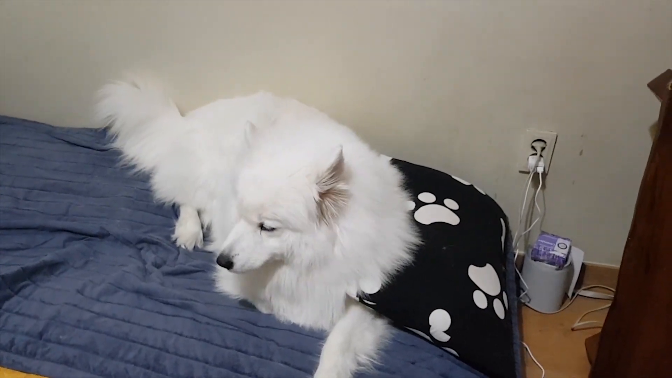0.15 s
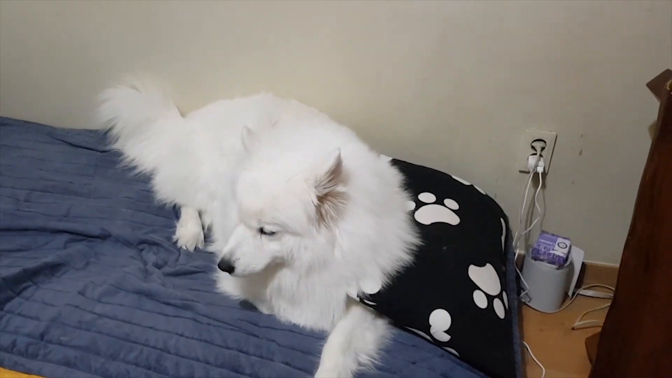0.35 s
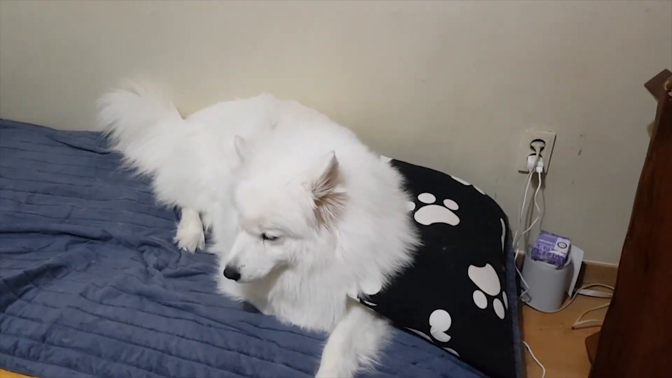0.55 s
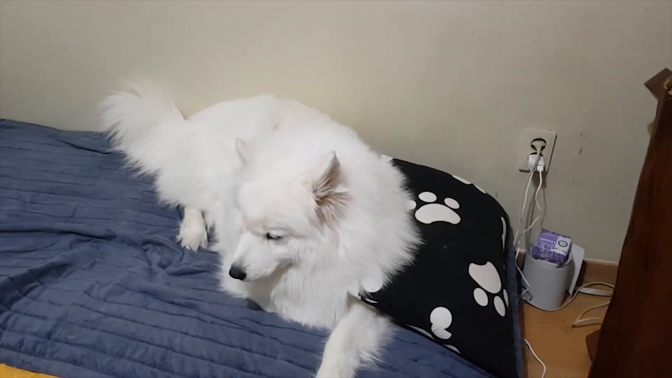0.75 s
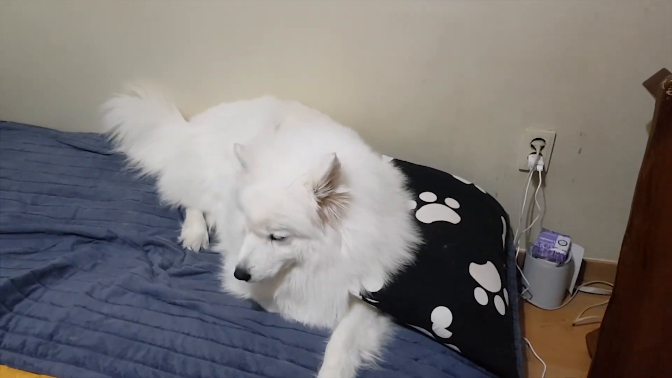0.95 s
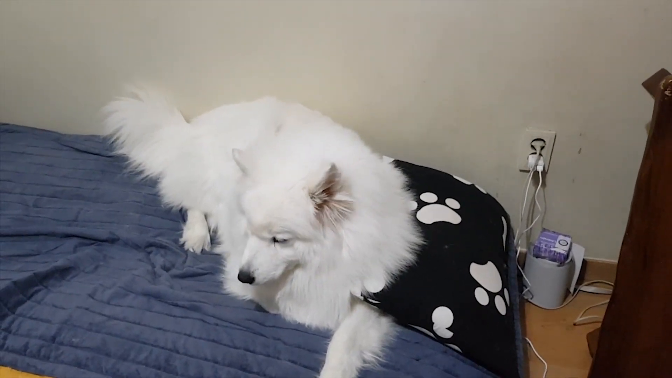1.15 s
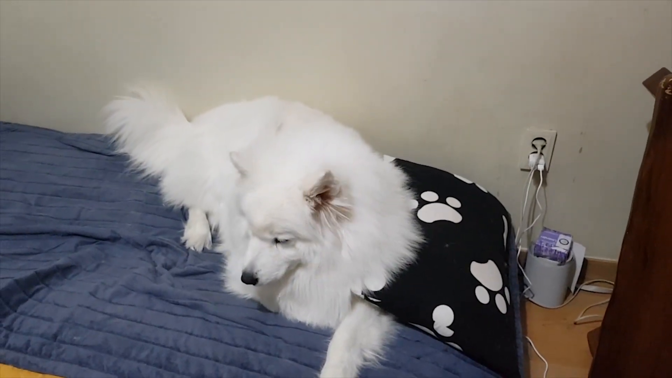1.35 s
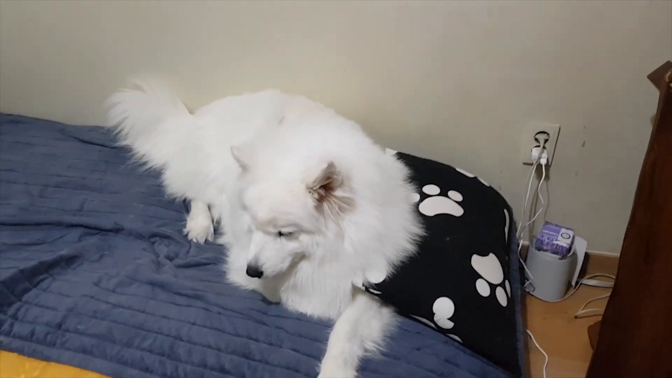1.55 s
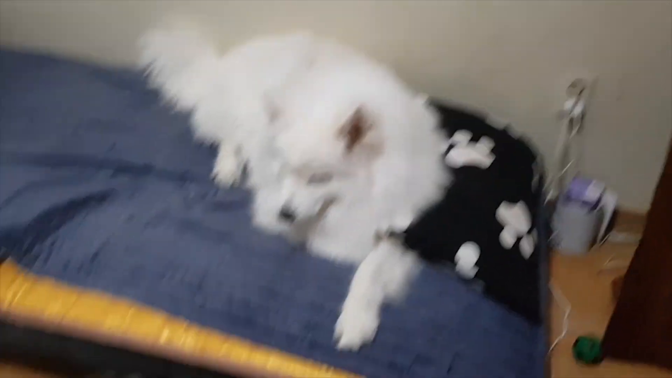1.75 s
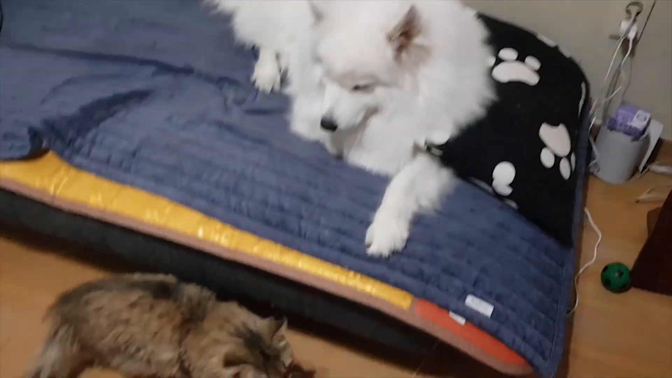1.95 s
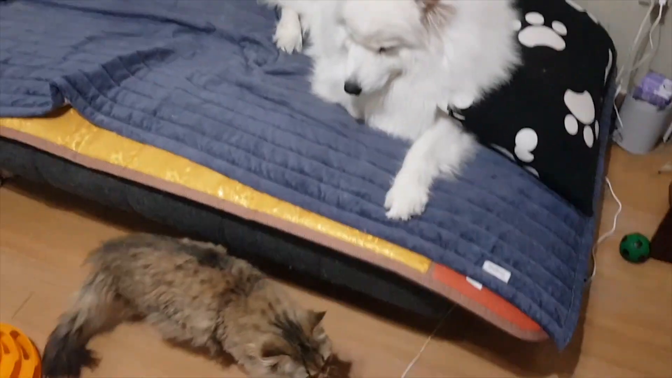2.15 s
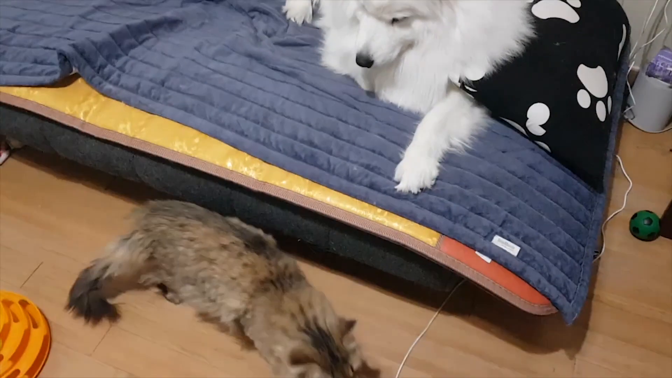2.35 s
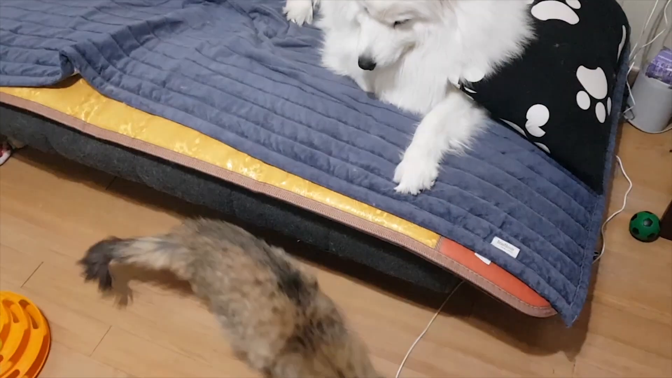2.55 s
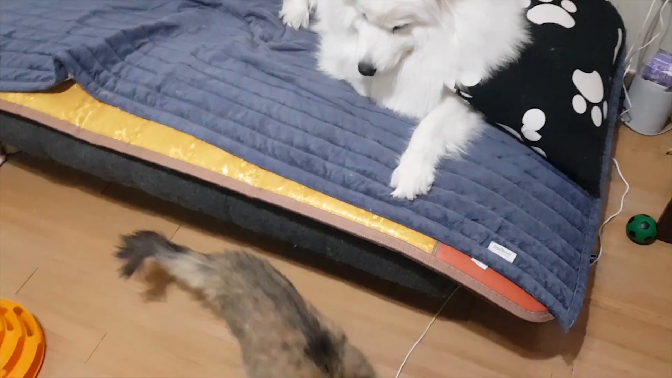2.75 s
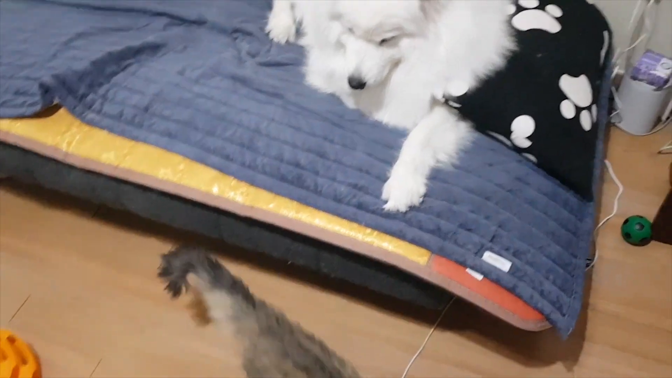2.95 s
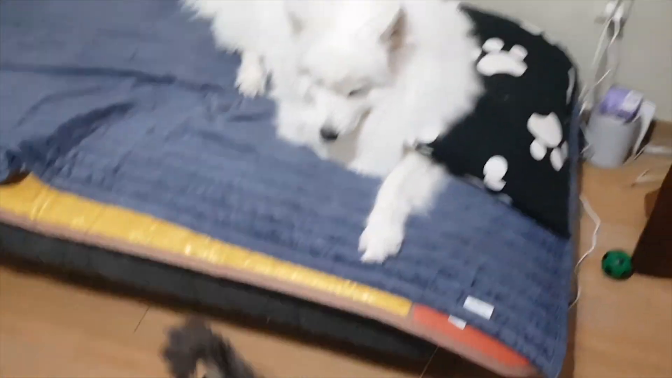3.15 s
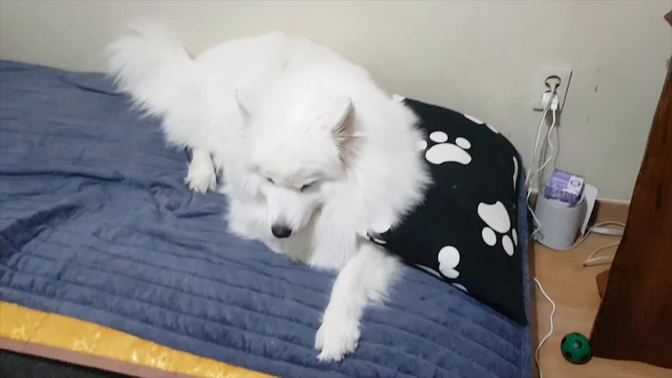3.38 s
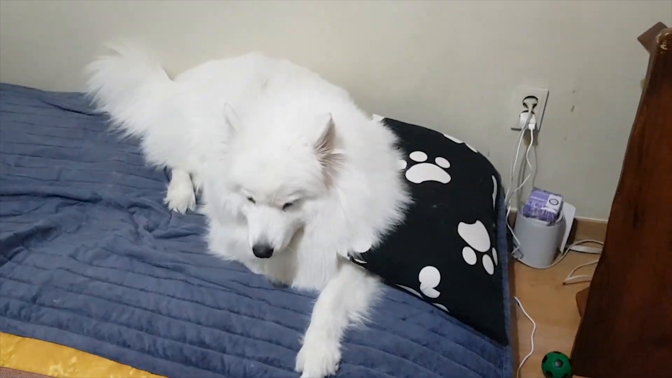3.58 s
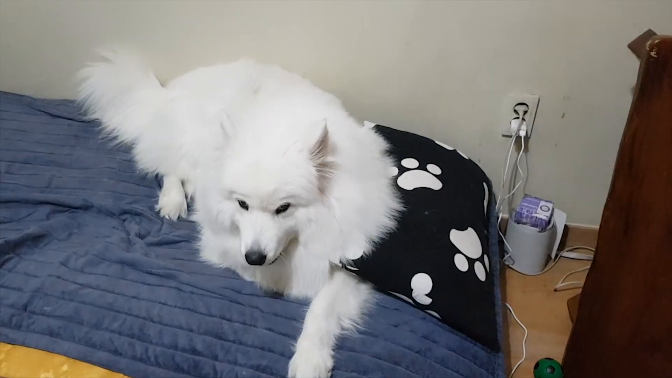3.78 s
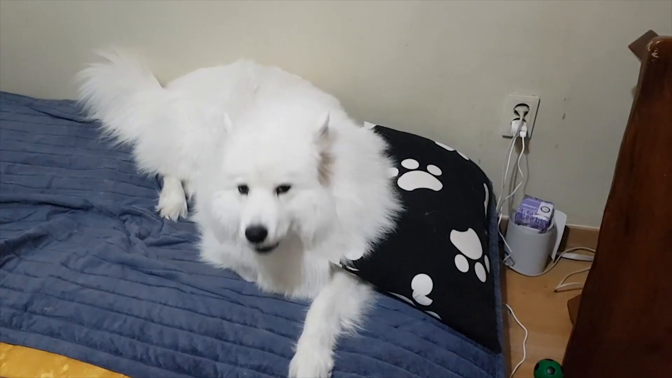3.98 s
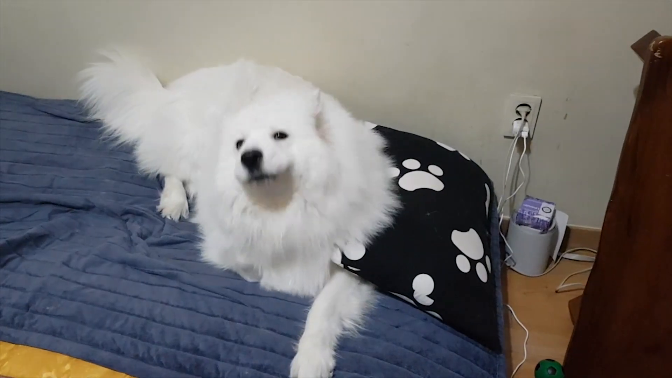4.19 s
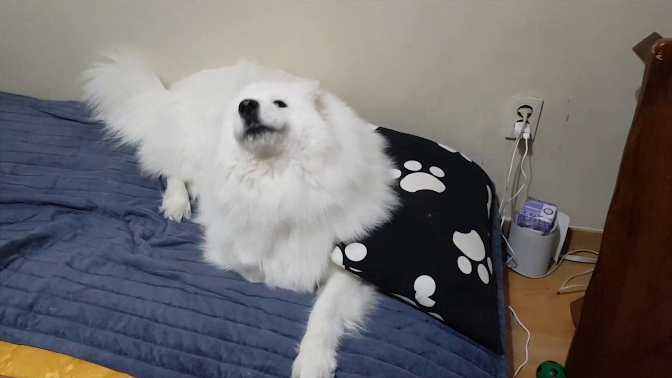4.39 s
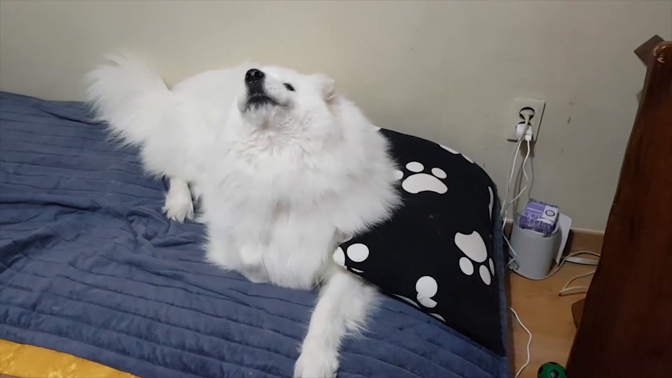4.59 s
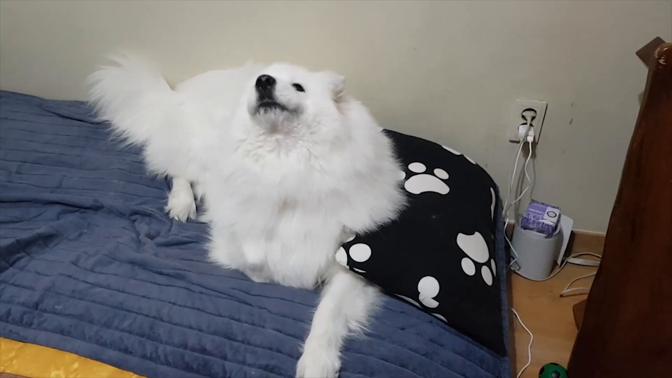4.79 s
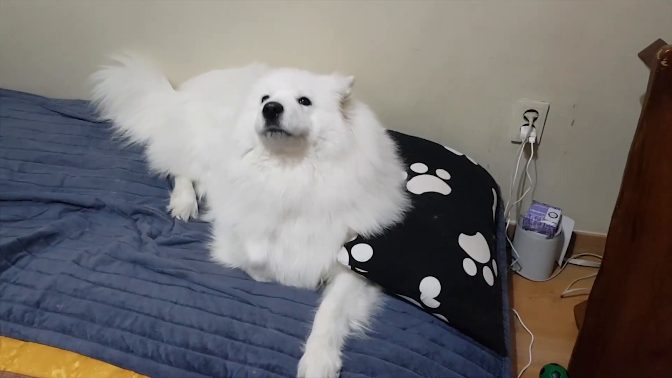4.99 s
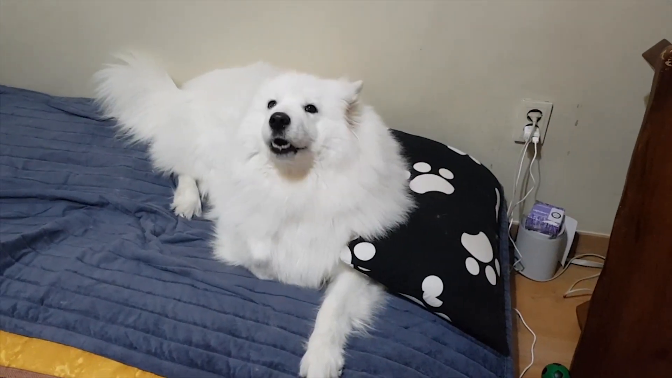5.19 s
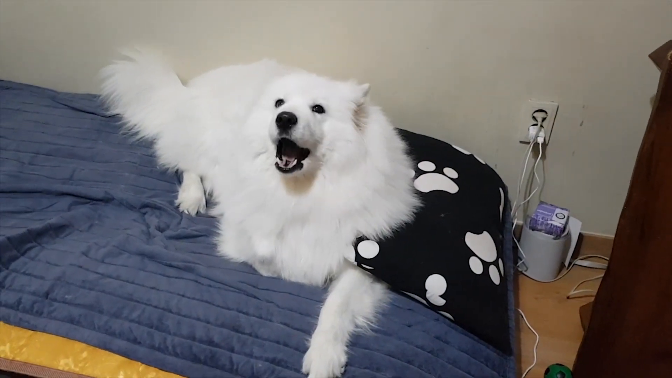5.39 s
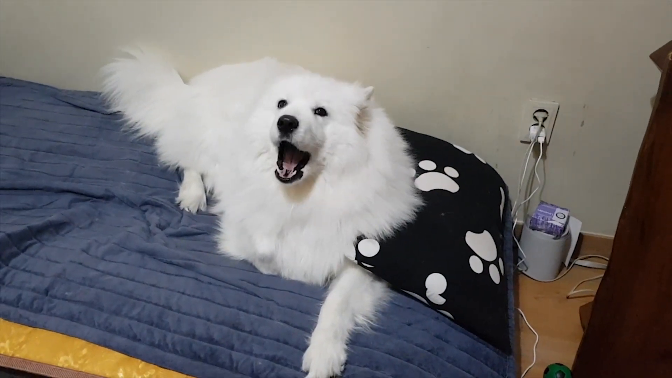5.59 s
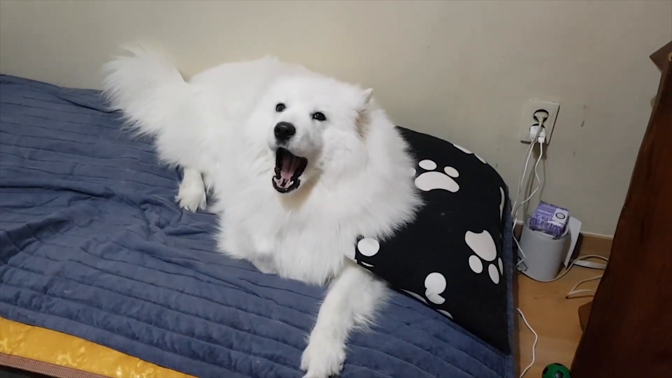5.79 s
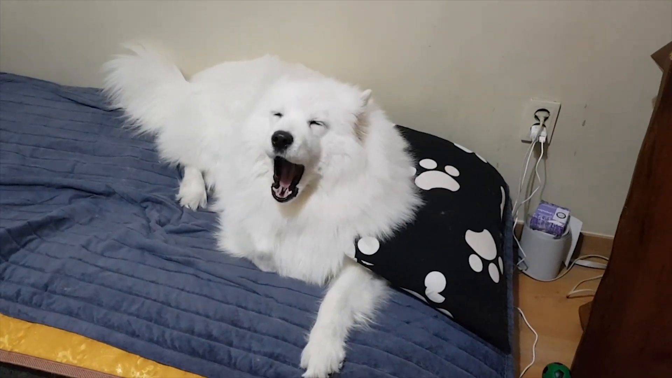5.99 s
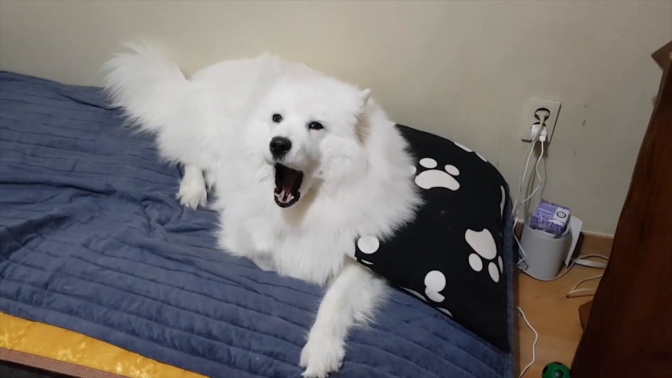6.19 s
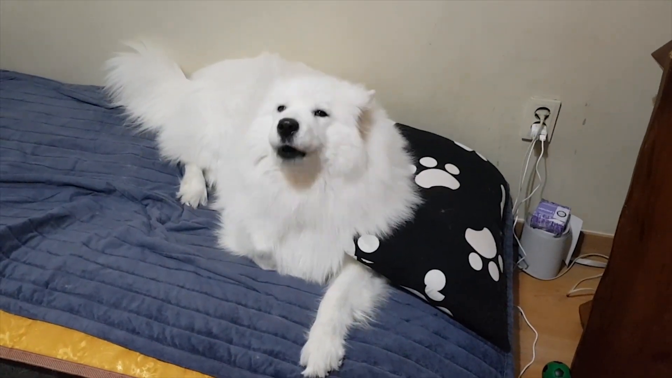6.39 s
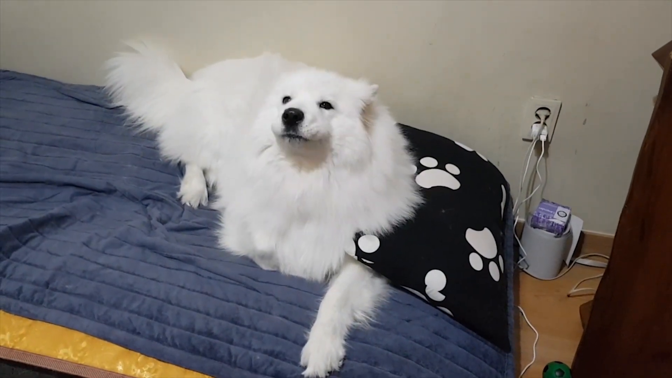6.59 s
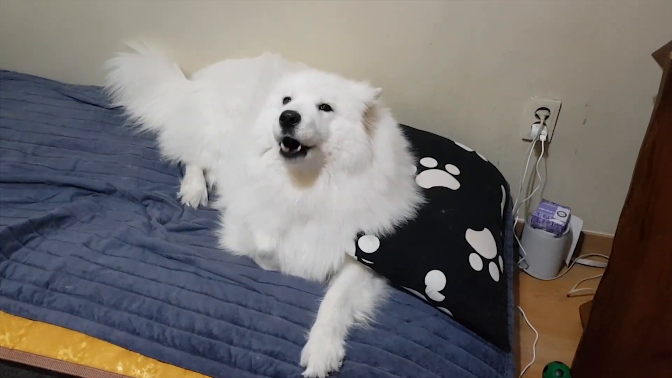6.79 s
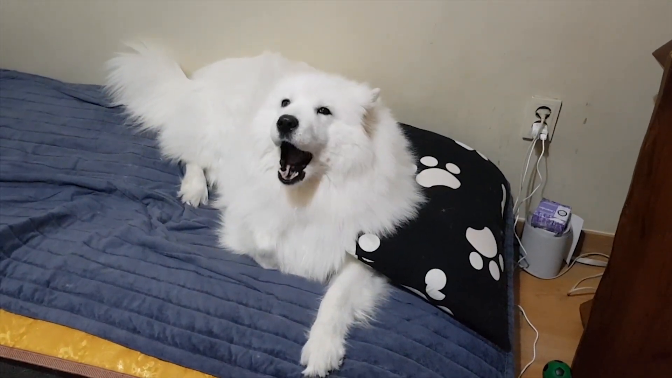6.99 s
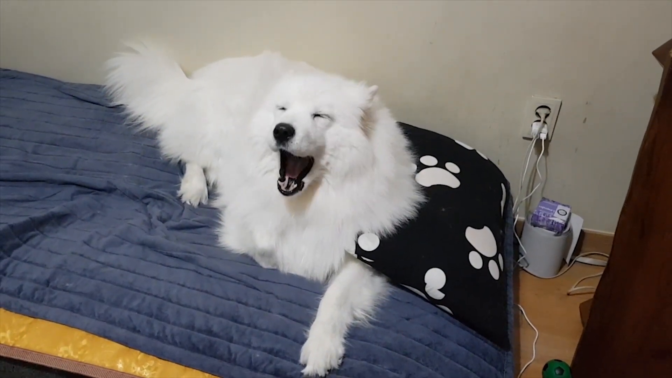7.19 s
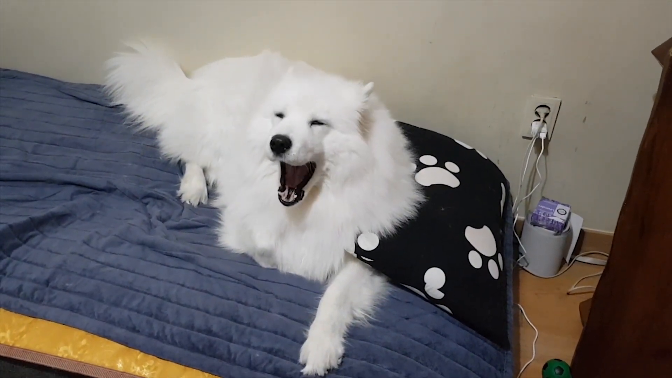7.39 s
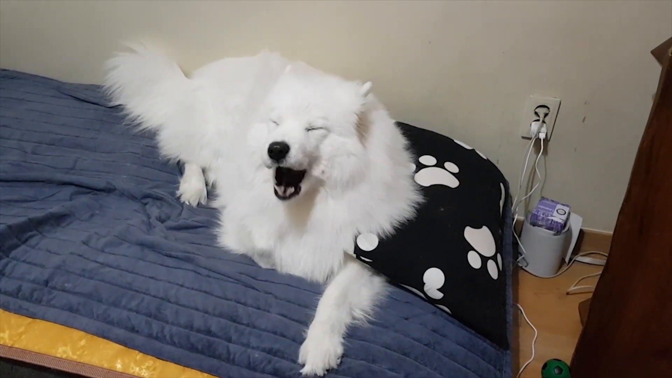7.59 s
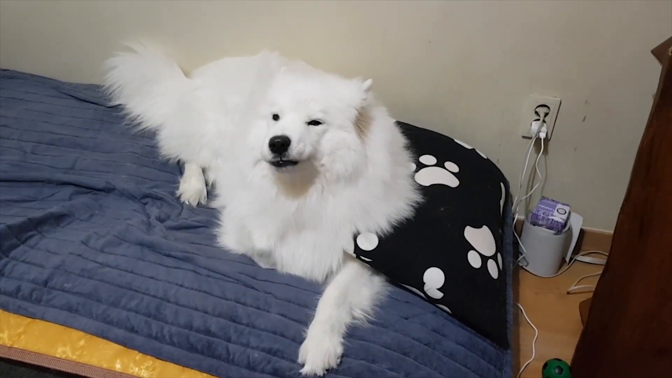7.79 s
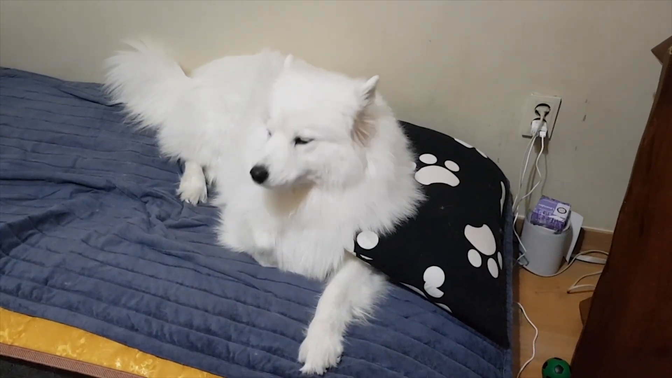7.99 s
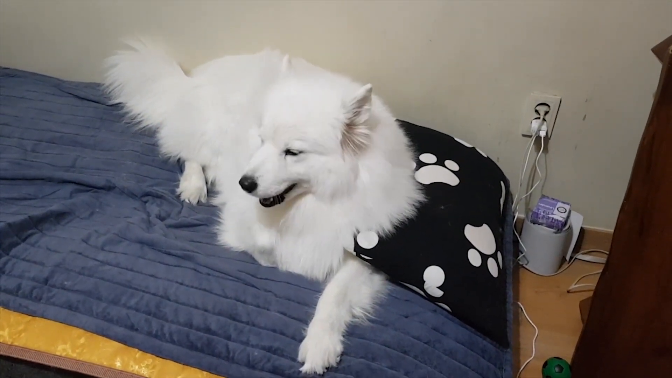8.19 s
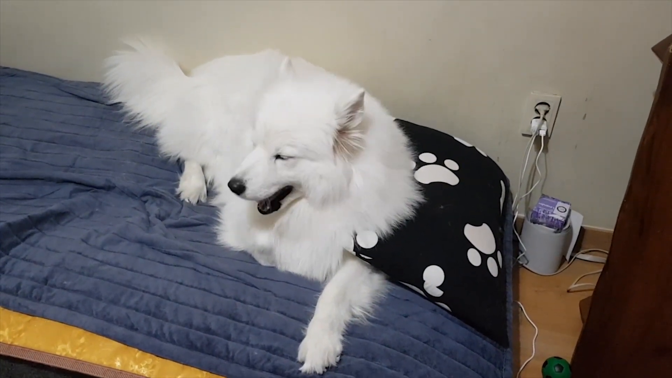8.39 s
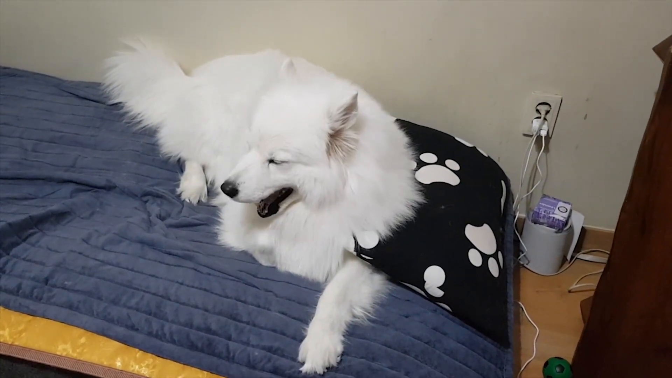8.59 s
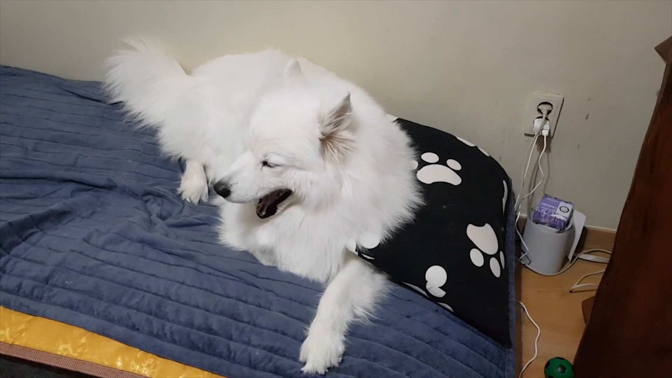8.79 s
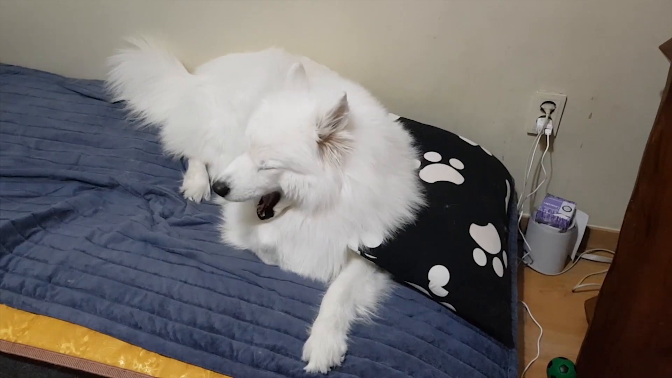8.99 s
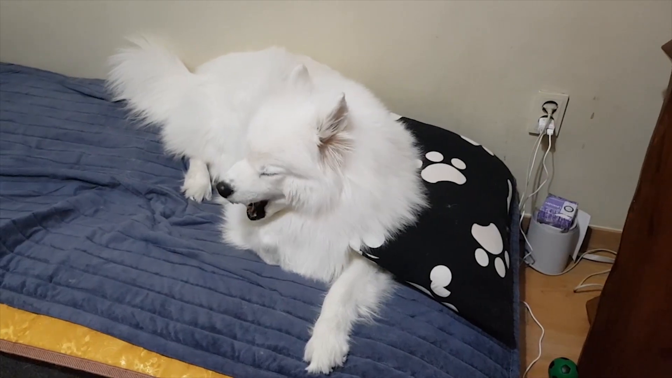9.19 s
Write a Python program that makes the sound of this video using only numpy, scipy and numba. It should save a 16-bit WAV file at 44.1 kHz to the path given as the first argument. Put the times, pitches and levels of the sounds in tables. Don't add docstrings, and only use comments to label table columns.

```python
import sys
import numpy as np
from scipy import signal
from scipy.fft import rfft, irfft
from scipy.io import wavfile
from scipy.ndimage import uniform_filter1d
from numba import njit

SR = 44100
rng = np.random.default_rng(int(sys.argv[2]) if len(sys.argv) > 2 else 0)


def unload_audio(sound):
    columns = np.transpose(np.atleast_2d(sound))
    steps = np.round(np.clip(columns, -1, 1) * 32767)
    wavfile.write(sys.argv[1], SR, steps.astype(np.int16))


def level_to_linear(level):
    exponent = np.asarray(level, float) / 20
    return 10 ** exponent


N = 407925

# time in seconds, pulse rate in Hz, effort in dB.
GRUMBLES = [
    [(0.0, 69.3, -37), (0.14, 65.2, -38), (0.412, 62.14, -41), (0.496, 59.47, -38.5), (0.55, 56.3, -45.5),
     (0.628, 48.24, -46.5), (0.66, 45.7, -53), (0.71, 45.2, -60)],
    [(3.12, 46.4, -62.5), (3.206, 46.45, -51.5), (3.326, 51.7, -42), (3.56, 53.36, -42.5),
     (3.59, 56.5, -44), (3.62, 58.2, -40.5), (3.7, 60.6, -39), (3.76, 64.55, -40), (3.924, 79.96, -35),
     (3.99, 89.3, -36), (4.19, 97.7, -29.5), (4.215, 99.4, -33), (4.27, 100, -45)],
    [(5.66, 70.4, -60.5), (5.692, 71.2, -52.5), (5.702, 70.8, -41.5), (5.8, 74, -36), (5.946, 76.26, -33.5),
     (6.09, 81.37, -32.5), (6.198, 90.9, -33.5), (6.256, 99.5, -30.5), (6.3, 100.3, -33.5),
     (6.4, 111.9, -40)],
    [(6.76, 77, -31), (6.828, 80.2, -33.5), (6.912, 79.56, -33.5), (7.0, 83.9, -37.5), (7.124, 91.5, -38.5),
     (7.18, 94.1, -40.5), (7.22, 98.3, -36.5)],
]
# time in seconds, pulse rate in Hz, effort in dB.
RATTLES = [
    [(1.3, 40.5, -64), (1.324, 39.7, -55), (1.446, 40, -47.5), (1.55, 38.3, -51), (1.6, 41, -64)],
    [(4.59, 78.1, -36), (4.786, 77.37, -37.5), (4.838, 72.16, -41), (4.896, 66.15, -41),
     (4.984, 58.4, -42.5), (5.092, 52.2, -51.5), (5.16, 49, -66)],
    [(8.08, 59.6, -40.5), (8.132, 59.13, -42.5), (8.234, 52.84, -52.5), (8.32, 49.8, -66)],
    [(8.66, 57.8, -76), (8.706, 58.3, -58.5), (8.794, 57.45, -58), (8.872, 60.6, -56), (8.93, 61.2, -65)],
]
# chest, muzzle and lips in dB, jaw in Hz, jaw in dB.
POSTURES = [(-5, -16, -31, 1490, -26.5), (-4.5, -21.5, -34.5, 1304, -44), (-1.5, -23.5, -30.5, 1400, -41.5),
            (-7, -23, -27.5, 1350, -40.5), (-11, -18.5, -28.5, 1810, -38),
            (-2.5, -18.5, -29.5, 1320, -34.5), (-17, -19, -27.5, 1340, -35), (-13, -18.5, -24.5, 1390, -22)]
# start in Hz, end in Hz.
MUZZLE_GLIDES = [(462, 478), (530, 367.6), (507, 385), (447, 370), (474, 470), (397, 465), (465, 430),
                 (480, 420)]
THROAT_DB = [3, -0.5, 0.5, -2.5, 0.5, 2, 3.5, -1]
# low start, low end, high start and high end in Hz, high level in dB.
LIPS = [(600, 620, 706, 760, 5), (725, 574, 834, 720, -9), (603, 600, 760, 990, -14),
        (573, 610, 740, 1050, -4), (600, 580, 710, 720, -2.5), (581, 676, 720, 840, -14),
        (640, 600, 790, 760, -10), (604, 620, 760, 830, -22)]
JAW_RISES = [1.1, 1, .9, 0.78, 1.02, 1.057, 1.08, 1.04]
# time in seconds, opening in dB.
MOUTH_OPENING = [(.3, -5), (.7, 0.5), (3.2, 11), (3.5, -6), (3.9, -6.5), (4.05, 6.5), (4.25, 7), (4.6, 7.5),
                 (4.85, 1.5), (5.1, 2.5), (5.75, 6.5), (6.1, 1.5), (6.25, -4), (6.35, 7), (6.8, 6.5),
                 (6.95, -4.5), (7.2, -12), (8.2, 4), (8.3, -9)]
# pitch in Hz, width in Hz, level in dB.
DOG_TRACT = [
    [(99.7, 48.4, 1.5)],
    [(159.1, 71.4, -3)],
]
# time in seconds, roughness from 0 to 1.
DOG_ROUGH = [(.45, .07), (.6, .3), (.7, .5), (1.3, .35), (1.6, .35), (3.1, .45), (3.3, .1), (4.2, .05),
             (4.56, .08), (4.62, .3), (5.2, .36), (5.7, .05), (6.25, .05), (6.3, .2), (6.4, .07),
             (6.6, .07), (6.66, .3), (6.75, .22), (6.8, .05), (7.3, .09), (8.02, .08), (8.1, .2),
             (8.16, .45), (8.85, .6), (9, .2)]

# time in seconds, pitch in Hz, level in dB, mouth opening in dB.
HOWLS = [
    [(4.22, 201.4, -30.5, -69.5), (4.278, 205.3, -28.5, -58), (4.32, 211.5, -31.5, -62),
     (4.398, 216.4, -31.5, -59.5), (4.44, 215.6, -33, -60), (4.5, 213.9, -36, -58),
     (4.566, 207.8, -29.5, -64), (4.62, 187, -43, -65.5)],
    [(6.29, 202.6, -42, -81), (6.346, 205.3, -29, -68), (6.378, 222.8, -29, -68.5),
     (6.406, 228.7, -22.5, -64.5), (6.456, 233.7, -24, -58), (6.6, 225.4, -25.5, -51.5),
     (6.625, 220.6, -30, -60), (6.67, 205.5, -36, -52), (6.71, 200.3, -33, -59.5), (6.78, 193, -45, -62.5)],
    [(7.195, 228.8, -33, -89.5), (7.236, 227.7, -32.5, -94), (7.538, 351.4, -36.5, -84),
     (7.616, 367.4, -37.5, -85.5), (7.73, 360, -39.5, -83.5), (7.87, 378.9, -40, -83),
     (7.935, 375.5, -50, -91), (7.998, 268.4, -36, -89), (8.03, 240, -31, -84), (8.045, 236.3, -42.5, -75),
     (8.09, 239.8, -38, -78), (8.115, 233, -52, -69)],
    [(8.9, 195, -56, -91), (8.98, 223.6, -55.5, -92), (9.0, 240.6, -44, -92), (9.028, 261, -49.5, -86),
     (9.076, 289.4, -51, -100), (9.134, 292.3, -53.5, -118), (9.22, 334, -65.5, -73)],
]
# time in seconds, second partial in dB, third partial in dB.
OVERTONES = [
    [(4.22, -49, -55), (4.27, -50, -44.5), (4.3, -55.5, -54.5), (4.33, -51.5, -53), (4.44, -48, -54),
     (4.5, -53.5, -54.5), (4.56, -48.5, -53.5), (4.62, -46, -57)],
    [(6.29, -53.5, -51.5), (6.37, -52.5, -56), (6.415, -46.5, -47.5), (6.45, -42.5, -68), (6.49, -36, -62),
     (6.54, -46.5, -56.5), (6.59, -48.5, -52.5), (6.62, -49.5, -53.5), (6.68, -44.5, -40),
     (6.71, -43.5, -49.5), (6.76, -39.5, -48.5)],
    [(7.2, -55.5, -71), (7.365, -66, -91.5), (7.435, -55, -91), (7.49, -77.5, -88), (7.565, -69.5, -78.5),
     (7.615, -69.5, -62.5), (7.71, -67.5, -74), (7.76, -49, -78.5), (7.8, -62, -78.5), (7.85, -56, -77.5),
     (7.88, -63.5, -94), (7.975, -53.5, -80), (8.005, -58, -77), (8.03, -44, -62), (8.055, -62, -62),
     (8.08, -47.5, -65), (8.11, -56, -68)],
    [(8.9, -55, -68), (8.975, -72, -84), (9, -62, -93), (9.05, -85, -94), (9.22, -79, -99)],
]
HALF_PITCH_DB = [-35, -35.5, -54, -79]
BREATH_DB = [-19.5, -29, -25.5, -12]
# time of one dip in seconds, stop in seconds, rate per second, depth in dB.
TREMORS = [(4.341, 4.6, 12.4, 3), (6.44, 6.695, 12.3, -0.5), (7.365, 7.568, 19, 2), (8.994, 9.3, 17.4, 3)]
THROB_DB = [4, 1, -0.5, 1]
MOUTH_AIR = [17, 8, 4, 4]
# start in Hz, end in Hz, width in Hz, level in dB.
PALATE = [(1300, 1270, 400, 8.5), (1080, 1440, 300, 6.5), (1280, 1380, 340, 8.5), (1280, 1300, 340, 7)]
# pitch in Hz, width in Hz, level in dB.
DOG_MOUTH = [(853, 180, 2), (2104, 480, -2), (2480, 520, -16)]

# time in seconds, decay in seconds, pitch in Hz, width in Hz, level in dB.
SMACKS = [(4.0585, 0.012, 3650, 600, -59.5), (4.0585, .03, 8400, 502, -78),
          (4.0585, .004, 6000, 5900, -75.5), (5.296, .02, 910, 170, -58.5), (5.296, 0.016, 2050, 398, -70),
          (5.418, 0.02, 990, 249, -67.5), (5.459, 0.018, 2650, 500, -75.5), (5.696, .025, 600, 130, -54.5),
          (6.3805, 0.014, 1950, 350, -54.5), (6.3805, 0.014, 2660, 500, -57),
          (6.3805, 0.01, 3850, 300, -65), (6.794, 0.012, 620, 120, -44), (2.126, 0.015, 1000, 1500, -72)]
# time in seconds, length in seconds, pitch in
# Hz, width in Hz, level in dB.
PUFFS = [(3.0, 0.2, 4300, 290, -69), (3.03, 0.26, 4600, 400, -71.5), (3.321, 0.17, 1750, 170, -72.5),
         (1.126, 0.022, 2260, 1000, -51.5), (1.581, 0.11, 310, 2000, -63.5), (1.64, 0.078, 337, 150, -56.5),
         (2.116, 0.13, 380, 340, -67), (0.676, 0.097, 1570, 270, -56.5), (8.035, 0.16, 1397, 140, -67.5),
         (8.04, 0.11, 2180, 280, -79), (0.42, 0.16, 840, 440, -65), (.7, 0.23, 826, 84, -72),
         (4.25, 0.19, 3310, 230, -80.5), (2.99, 0.16, 840, 116, -63), (3.02, 0.21, 1790, 320, -58),
         (6.62, 0.17, 1400, 190, -55.5), (.78, 0.21, 1380, 100, -67), (0.51, 0.068, 1870, 430, -69),
         (6.3, 0.06, 930, 120, -56), (6.345, 0.04, 830, 110, -48), (6.39, .1, 3200, 640, -72.5),
         (6.33, 0.18, 6600, 7700, -72.5)]
# time in seconds, length in seconds, pitch in Hz, level in dB.
WHISTLES = [(3.397, 0.68, 5320, -80), (3.954, 0.18, 5840, -77), (4.05, 0.54, 8400, -83.5),
            (4.245, 0.46, 9440, -82), (5.796, 0.17, 8260, -87.5), (6.491, 0.25, 5780, -70.5),
            (6.528, 0.24, 7480, -82.5), (7.602, 0.25, 8530, -83.5)]

# time in seconds, pitch in Hz, level in dB, rasp in dB.
MEWS = [
    [(0.66, 517, -84, -20), (0.744, 535.4, -66.5, 0.5), (0.86, 546, -63.5, 1.5), (0.932, 547.4, -61, -0.5),
     (0.975, 555, -61.5, -1), (1.0, 578, -57.5, -5), (1.034, 592, -58.5, -8), (1.056, 599, -57.5, -8),
     (1.1, 587, -57.5, -16), (1.138, 556.5, -58.5, -17), (1.168, 570, -85, 18), (1.25, 573, -106, -11)],
    [(1.65, 642, -68, 8), (1.73, 650, -69, -2), (1.79, 683, -61, 3), (1.825, 650, -66, 1),
     (1.855, 657, -57, -3), (1.9, 662, -60, -9), (1.96, 655, -60.5, -5), (1.985, 658, -84, 0),
     (2.04, 662, -84, 5), (2.075, 715, -79, 10), (2.154, 740, -81, 10), (2.22, 725, -100, 14)],
    [(3.18, 480, -59, 4), (3.2, 506, -58.5, 2), (3.244, 535, -63.5, 0), (3.275, 538, -61, 0),
     (3.33, 550, -71, -6), (3.4, 545, -90, 2)],
    [(5.1, 660, -88, -3), (5.13, 650, -80, -7), (5.19, 660, -83, -7), (5.24, 650, -97, 0)],
]
# time in seconds, pitch in Hz, level in dB, rasp in dB.
SQUEAL = [(2.97, 853, -80, -4), (3.031, 925, -63.5, 7), (3.068, 860, -58.5, 3), (3.157, 951, -47.5, -11),
          (3.219, 1016, -69, 6)]
# level in dB near 1, 2, 3 and 5 kHz.
CAT_MOUTHS = [(-2.5, -3.5, 3, -3), (-45, 0, -50, -39), (-15, 1, -11.5, -17), (-9, -2, -12, -17),
              (-14, -1, -24, -19.5)]
# pitch in Hz, width in Hz, level in dB.
CAT_TRACT = [
    [(1012, 580, 1.5), (650, 190, -17)],
    [(1932, 700, 0)],
    [(2660, 1500, -0.54), (3675, 900, -0.46)],
    [(4560, 1350, -3), (5740, 2700, -8)],
]
RASP_SHARES = [0, 0, .3, 1]
CAT_HUM_DB = [-40, -5, -40, -14, -40]
CAT_FLUTTER_DB = [0, 3.5, 0, 2, 0]
# time in seconds, roughness from 0 to 1.
CAT_ROUGH = [(.66, .3), (.8, .34), (.88, .24), (.93, .13), (.98, .1), (1.02, .07), (1.12, .06), (1.15, .5),
             (1.8, .5), (1.84, .06), (2.02, .07), (2.06, .3), (2.98, .5), (3.085, .55), (3.12, .14),
             (3.2, .08), (3.32, .07), (3.36, .4), (5, .15)]
# time in seconds, length in seconds, start in Hz, end in Hz, level in dB.
RASPS = [(0.71, 0.066, 1580, 2160, -59.5), (0.771, 0.047, 2170, 2500, -59.5),
         (0.768, 0.095, 4120, 4700, -63.5), (0.717, 0.13, 5120, 5330, -63.5),
         (0.721, 0.052, 3960, 4160, -67), (3.17, 0.12, 2360, 2730, -65.5), (6.32, 0.07, 1950, 2050, -72.5)]

# time in seconds, tick in dB, tick in Hz, tail in dB, tail decay in seconds.
RUSTLE = [(0, -50, 5000, -78.5, 0.01), (0.001, -35, 1270, -61, 0.0044), (0.429, -49.5, 8800, -66.5, 0.083),
          (.5315, -62, 9100, -75, 0.01), (.554, -66, 9000, -69, .01), (1.5803, -46, 6050, -64.5, 0.04),
          (1.598, -56, 8000, -57, 0.029), (1.619, -42.5, 10500, -60, 0.028),
          (1.6287, -44, 11000, -54, 0.023), (1.6537, -46, 11680, -58, 0.022),
          (1.664, -47, 11700, -57.5, 0.028), (1.681, -60, 10900, -63, 0.026)]
# time in seconds, decay in seconds, pitch in Hz, width in Hz, level in dB.
THUMP = (.427, .02, 1600, 2400, -55.5)
# pitch in Hz, level in dB per Hz.
ROOM_TONE = [(13, -45.5), (22, -25.5), (44, -9), (63, -3), (80, -17), (95, -2.5), (115, -2), (194, -14),
             (229, -23.5), (263, -19), (672, -36), (1070, -40), (1300, -42), (2200, -45.5), (16000, -53.5)]
# pitch in Hz, width in Hz, level in dB.
MIC_HISS = (13500, 6500, -81)
# pitch in Hz, width in Hz, level in dB.
LEFT_BUMP = (644, 600, -6)

LEFT_DB = 2.2


def growls():
    lips_follow, muzzle_follows = 0.92, 0.18
    chest_slope, muzzle_slope = -7.5, 11.5
    throat_hz, throat_width, throat_rises = 242.8, 128.7, 0.069
    muzzle_width, lips_width = 164, 171
    out = np.zeros(N)
    for table, posture, muzzle_hz, throat_db, lip, rise in zip(
            GRUMBLES + RATTLES, POSTURES, MUZZLE_GLIDES, THROAT_DB, LIPS, JAW_RISES):
        chest_db, muzzle_db, lips_db, jaw_hz, jaw_db = posture
        at, gate, rough, (hz, db) = unfold(table, DOG_ROUGH)
        pulses, air, _ = folds(hz, rough, jitter=.3, shimmer=.6)
        open_db = np.interp(at / SR, *np.transpose(MOUTH_OPENING))
        octaves = np.log2(hz / 70)
        rising = np.maximum(octaves, 0)

        def puffed(puff):
            return flicker(len(at), 14, 2.2) * (pulses + (puff + 2.7 * rough) * air)

        low = sweep(puffed(0.29), throat_hz * 2 ** (throat_rises * rising), throat_width)
        low += level_to_linear(chest_db + chest_slope * octaves) * resonate(puffed(0.026), DOG_TRACT[0])
        low += level_to_linear(throat_db) * resonate(puffed(0.052), DOG_TRACT[1])
        muzzle_gain = level_to_linear(muzzle_db + 2.0 + muzzle_follows * open_db + muzzle_slope * rising)
        low += muzzle_gain * sweep(puffed(0.7), muzzle_hz, muzzle_width)
        breathy = puffed(1.0)
        lips = sweep(breathy, lip[:2], lips_width, count=3)
        lips = lips - level_to_linear(lip[4]) * sweep(breathy, lip[2:4], lips_width, count=3)
        lips = level_to_linear(lips_db + lips_follow * open_db) * lips
        rush = pulses + 4.0 * air
        jaws = sweep(rush, [jaw_hz, jaw_hz * rise], 300)
        jaws = jaws + resonate(rush, [(.8 * jaw_hz, 300, -5), (2170, 300, -18)])
        harmonic = np.sqrt(2) * hz / SR
        out[at] += gate * level_to_linear(db) * ((low + lips) / harmonic + level_to_linear(jaw_db + open_db) * held(jaws, hz))
    return out


def howls():
    throb_per_s, half_pitch_fade_s = 27, 0.11
    out = np.zeros(N)
    for table, half_db, breath_db, over, tremor, throb_db, airy, palate in zip(
            HOWLS, HALF_PITCH_DB, BREATH_DB, OVERTONES, TREMORS, THROB_DB, MOUTH_AIR, PALATE):
        at, gate, rough, (hz, level_db, mouth_db) = unfold(table, DOG_ROUGH)
        pulses, air, phase = folds(hz, rough, jitter=0.12, shimmer=1.2)
        turn = np.unwrap(2 * np.pi * phase)
        t = at / SR
        throb = level_to_linear(throb_db * np.sin(2 * np.pi * throb_per_s * t))
        dip, stop, rate, depth_db = tremor
        trembling = np.cos(2 * np.pi * rate * (t - dip)) * np.clip((stop - t) * rate, 0, 1)
        level_db = level_db - depth_db * trembling
        tone = level_to_linear(level_db) * flicker(len(at), 25, .6) * np.sin(turn)
        s, *upper = np.transpose(over)
        for k, db in enumerate(upper):
            gain = level_to_linear(np.interp(t, s, db)) * throb ** k * flicker(len(at), 60, 1.8)
            tone += gain * np.sin((k + 2) * turn)
        fade = np.exp(-((at - at[0]) / SR / half_pitch_fade_s) ** 2)
        tone += level_to_linear(half_db) * fade * np.sin(turn / 2)
        throat_air = tract(air, [(232, 280, -2.0), (576, 210, -19.0)], hz)
        tone += level_to_linear(level_db + breath_db) * throat_air
        edge = pulses + airy * rough * air
        mouth = resonate(edge, DOG_MOUTH) - level_to_linear(palate[3]) * sweep(edge, palate[:2], palate[2])
        out[at] += gate * (np.sqrt(2) * tone + level_to_linear(mouth_db) * throb * held(mouth, hz))
    return out


def smacks():
    out, t = np.zeros(N), np.arange(5000) / SR
    for s, decay, hz, width, db in SMACKS:
        band = unit(ring(rng.standard_normal(9000), hz, width))[-len(t):]
        envelope = np.minimum(t * 2000, 1) * np.exp(-t / decay)
        out[int(s * SR):][:len(t)] += level_to_linear(db) * envelope * band
    return out


def puffs():
    out, t = np.zeros(N), np.arange(N) / SR
    whistles = [(s, length, hz, 0.09 * hz, db) for s, length, hz, db in WHISTLES]
    for s, length, hz, width, db in PUFFS + whistles:
        at = slice(int(s * SR), int((s + length) * SR))
        u = (t[at] - s) / length
        swell = np.sin(np.pi * np.clip(u, 0, 1) ** 0.51)
        hiss = unit(ring(rng.standard_normal(30000), hz, width))[:len(u)]
        out[at] += level_to_linear(db) * swell * hiss
    return out


def cat():
    flutter_per_s, flutter_dip_s = 31, 1.883
    out = np.zeros(N)
    for table, mouth, hum_db, flutter_db in zip(MEWS + [SQUEAL], CAT_MOUTHS, CAT_HUM_DB, CAT_FLUTTER_DB):
        at, gate, rough, (hz, level_db, rasp_db) = unfold(table, CAT_ROUGH)
        pulses, air, phase = folds(hz, rough, jitter=.11, shimmer=.8, limp=2.4)
        hum = 2 * np.sin(2 * np.pi * phase)
        out[at] += gate * level_to_linear(level_db + hum_db - 80 * rough) * hum
        level_db = level_db - flutter_db * np.cos(2 * np.pi * flutter_per_s * (at / SR - flutter_dip_s))
        source = pulses + 1.6 * rough * air
        for db, share, group in zip(mouth, RASP_SHARES, CAT_TRACT):
            gain = level_to_linear(level_db + db + share * rasp_db) * flicker(len(at), 34.0, 3.0)
            out[at] += gate * gain * tract(source, group, hz)
    return out


def rasps():
    out = np.zeros(N)
    for s, length, from_hz, to_hz, db in RASPS:
        size = int(length * SR)
        band = unit(sweep(rng.standard_normal(9000)[:size], [from_hz, to_hz], 210, count=3))
        swell = np.sin(np.pi * np.linspace(0, 1, size) ** 0.92)
        out[int(s * SR):][:size] += level_to_linear(db) * swell * band
    return out


def cloth():
    tick_s, echo_s, echo_db = .0004, .002, -2
    out, t = np.zeros((2, N)), np.arange(9000) / SR
    tick = np.exp(-t / tick_s)
    tick = tick + level_to_linear(echo_db) * np.roll(tick, int(echo_s * SR))
    for s, tick_db, hz, tail_db, decay in RUSTLE:
        hiss = unit(ring(rng.standard_normal((2, len(t))), hz, 1.8 * hz))
        tail = np.exp(-t / decay) * flicker(len(t), 350, 0.92)
        out[:, int(s * SR):][:, :len(t)] += hiss * (level_to_linear(tick_db) * tick + level_to_linear(tail_db) * tail)
    s, decay, hz, width, db = THUMP
    thud = unit(ring(rng.standard_normal((2, len(t))), hz, width))
    out[:, int(s * SR):][:, :len(t)] += level_to_linear(db) * thud * t / decay * np.exp(1 - t / decay)
    return out


def room_tone():
    room_db, alike_hz, hiss_left_db = -56.5, 716, .4
    f = np.arange(N // 2 + 1) * SR / N + 1
    hz, db = np.transpose(ROOM_TONE)
    mid, side = rfft(rng.standard_normal((2, N))) * level_to_linear(np.interp(np.log(f), np.log(hz), db))
    side = side * np.clip(f / alike_hz, .12, 1)
    tone = irfft(np.array([mid + side, mid - side]), N) / np.sqrt(np.mean(irfft(mid, N) ** 2))
    hiss_hz, hiss_width, hiss_db = MIC_HISS
    hiss = unit(ring(rng.standard_normal((2, N)), hiss_hz, hiss_width))
    balance_db = (hiss_left_db - LEFT_DB) / 2 * np.array([[1], [-1]])
    return level_to_linear(room_db) * tone + level_to_linear(hiss_db + balance_db) * hiss


def bedroom(x):
    t60_s, wet_db, boom_db = 0.25, -4.5, -30
    t = np.arange(SR // 2) / SR
    tail = rng.standard_normal((3, len(t))) * np.exp(-np.log(1000) * t / t60_s) * (t > .004)
    bright = signal.lfilter(*signal.butter(2, [640, 5000], "bandpass", fs=SR), tail[:2])
    boom = ring(tail[2], 350, 600)
    echo = level_to_linear(wet_db) * unit(bright) + level_to_linear(boom_db) * unit(boom)
    return signal.fftconvolve(x[None], echo / np.sqrt(len(t)), axes=1)[:, :N]


def unfold(table, rough):
    s, *columns = np.transpose(table)
    at = np.arange(int(s[0] * SR), min(int(s[-1] * SR), N))
    since_start = at - at[0] + (at[0] < 50) * SR
    gate = np.clip(np.minimum(since_start, at[-1] - at) / (0.016 * SR), 0, 1)
    roughness = np.interp(at / SR, *np.transpose(rough))
    return at, gate, roughness, [np.interp(at / SR, s, c) for c in columns]


def folds(hz, rough, jitter, shimmer, limp=0):
    chance = rng.standard_normal((1500, 2)) * [jitter, shimmer]
    chance[::2, 1] -= limp
    pulses, phase = fire(hz, rough, chance)
    air = np.exp(-phase / 0.5) * rng.standard_normal(len(hz)) * np.sqrt(hz / SR)
    return pulses, air, phase


@njit
def fire(hz, rough, chance):
    pulses, phase = np.zeros(len(hz) + 1), np.empty(len(hz))
    p, k = .9, 0
    for i in range(len(hz)):
        step = hz[i] * np.exp(rough[i] * chance[k, 0]) / SR
        p += step
        if p >= 1:
            p, k = p - 1, k + 1
            size = np.exp(rough[i] * chance[k, 1])
            pulses[i] += size * p / step
            pulses[i + 1] += size * (1 - p / step)
        phase[i] = p
    return pulses[:-1], phase


def flicker(size, rate, db):
    span = int(SR / rate)
    walk = uniform_filter1d(np.repeat(rng.standard_normal(size // span + 1), span), span)[:size]
    return level_to_linear(db * walk)


def ring(x, hz, width, count=2):
    for _ in range(count):
        x = signal.lfilter(*signal.iirpeak(hz, hz / width, SR), x)
    return x


def resonate(x, group):
    return sum((-1) ** k * level_to_linear(db) * ring(x, f, w, count=4) for k, (f, w, db) in enumerate(group))


def tract(x, group, hz):
    return held(resonate(x, group), hz)


def held(y, hz):
    span = int(SR * max(.03, 4 / hz.mean()))
    power = uniform_filter1d(uniform_filter1d(y ** 2, span), span)
    return y / np.sqrt(power + 1e-14)


@njit
def glide(x, hz, width):
    y, band, low = np.empty(len(x)), 0., 0.
    for i in range(len(x)):
        g, k = np.tan(np.pi * hz[i] / SR), width / hz[i]
        v = (band + g * (x[i] - low)) / (1 + g * (g + k))
        band, low, y[i] = 2 * v - band, low + 2 * g * v, k * v
    return y


def sweep(x, hz, width, count=4):
    hz = np.interp(np.linspace(0, 1, len(x)), np.linspace(0, 1, len(hz)), hz)
    for _ in range(count):
        x = glide(x, hz, 1. * width)
    return x


def unit(x):
    return x / np.sqrt(np.mean(x ** 2))


def scene():
    dog_lag, cat_lag, far_side_lag = 5, 2, 10
    dog = growls() + howls() + puffs() + smacks()
    mews = cat() + rasps()
    far_side = np.arange(N) < 1.3 * SR
    late = np.where(far_side, np.roll(mews, far_side_lag), np.roll(mews, cat_lag))
    bump_hz, bump_width, bump_db = LEFT_BUMP
    bump = level_to_linear(bump_db) * ring(dog, bump_hz, bump_width)
    direct = np.array([dog + bump + mews, np.roll(dog - bump / 2, dog_lag) + late])
    ports = level_to_linear([[LEFT_DB / 2], [-LEFT_DB / 2]])
    return ports * (direct + bedroom(dog + mews) + cloth() + room_tone())


def top_cut(x):
    return signal.sosfilt(signal.butter(12, 16690, fs=SR, output="sos"), x)


def record(dry):
    low_pass = signal.ellip(10, .2, 80, 15720, fs=SR, output="sos")
    return top_cut(signal.sosfilt(low_pass, dry))


dry = scene()
out = record(dry)
unload_audio(out)
```